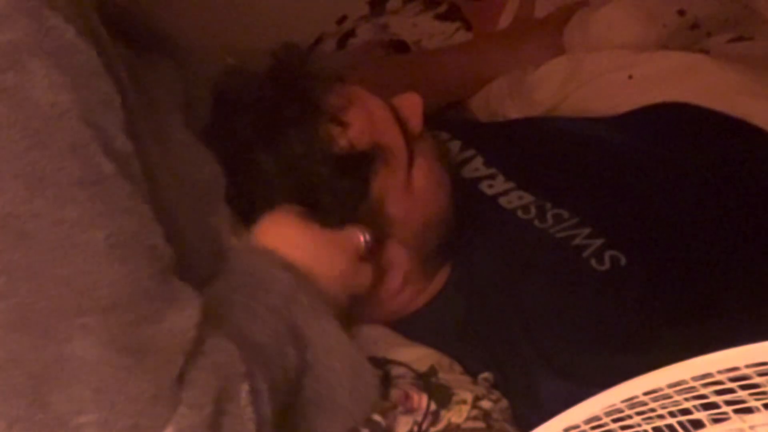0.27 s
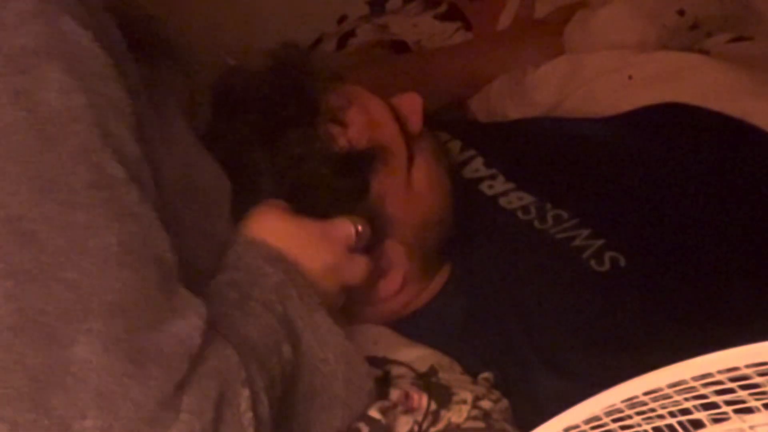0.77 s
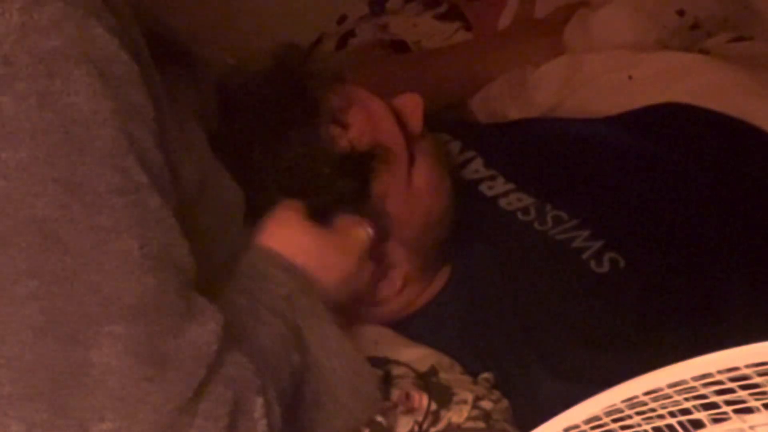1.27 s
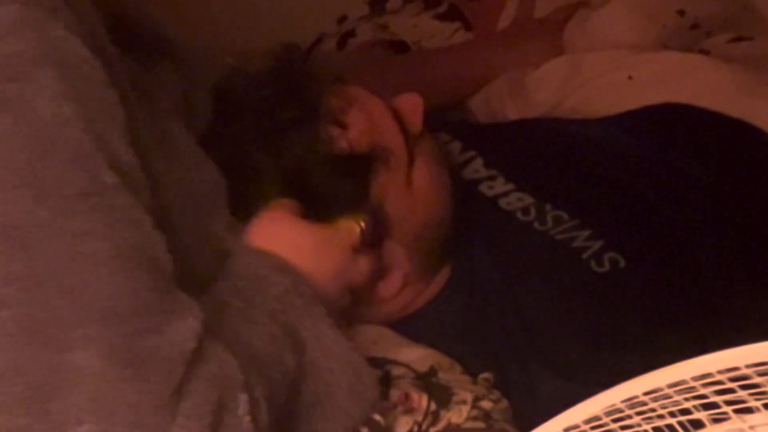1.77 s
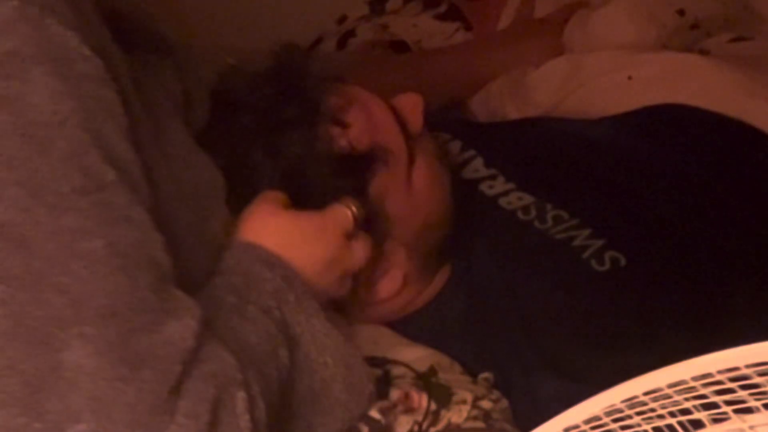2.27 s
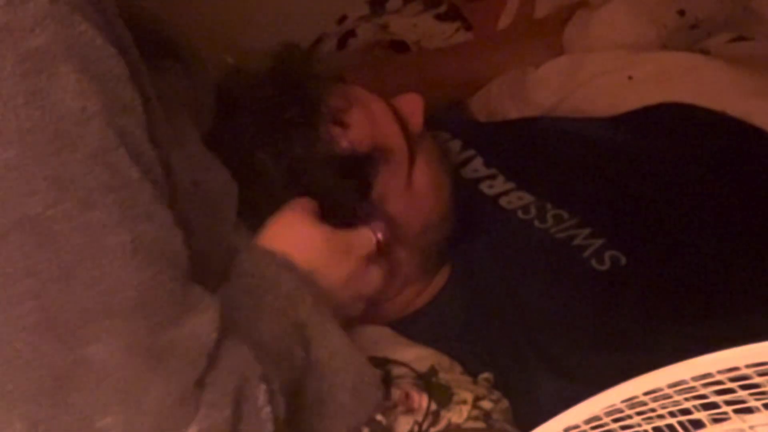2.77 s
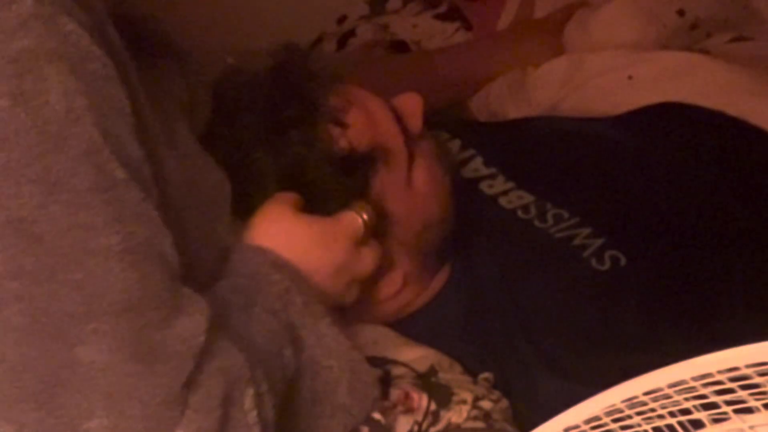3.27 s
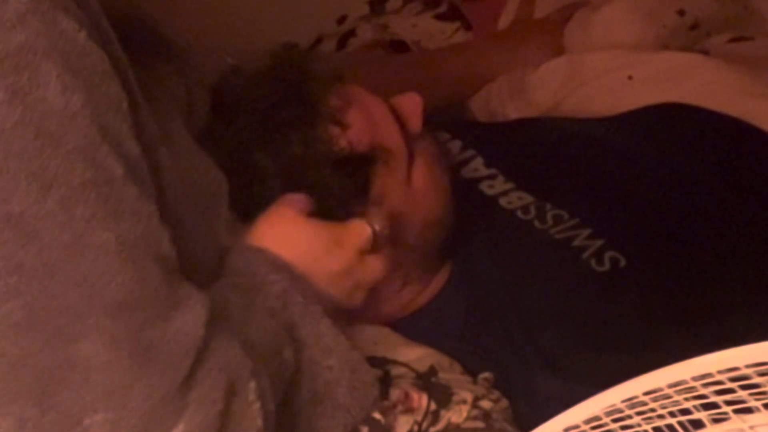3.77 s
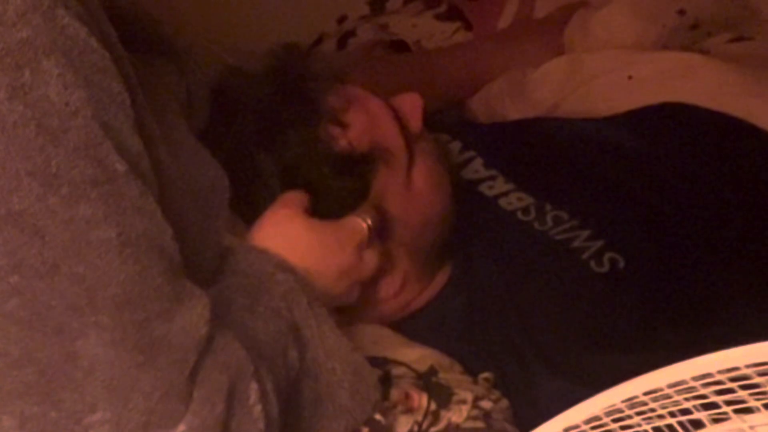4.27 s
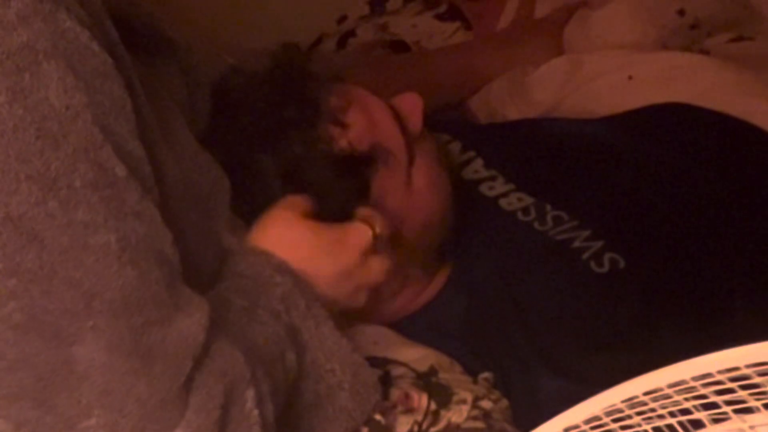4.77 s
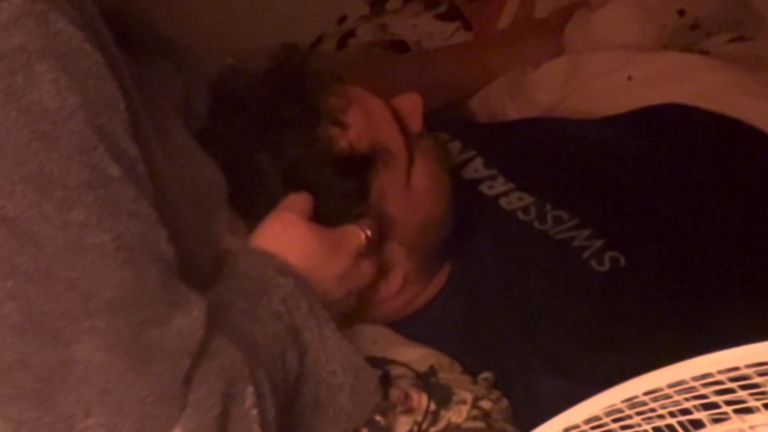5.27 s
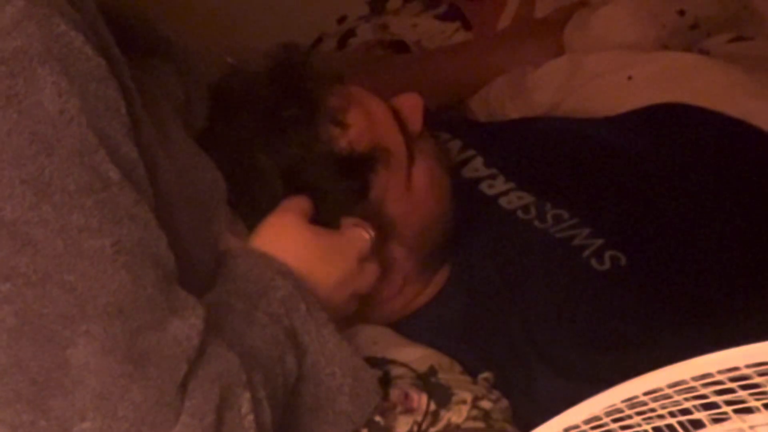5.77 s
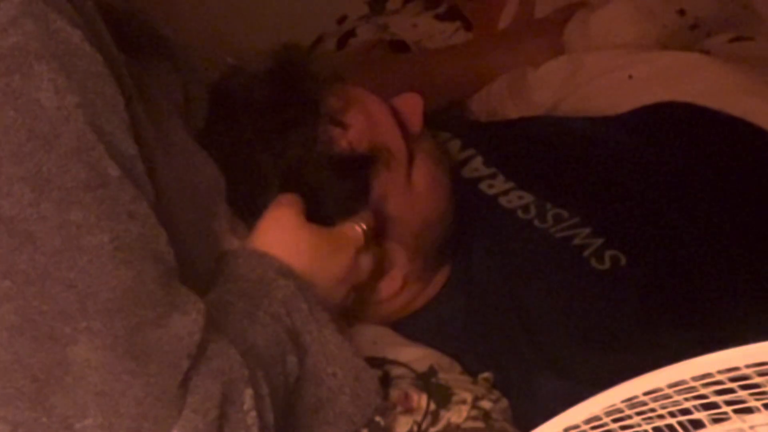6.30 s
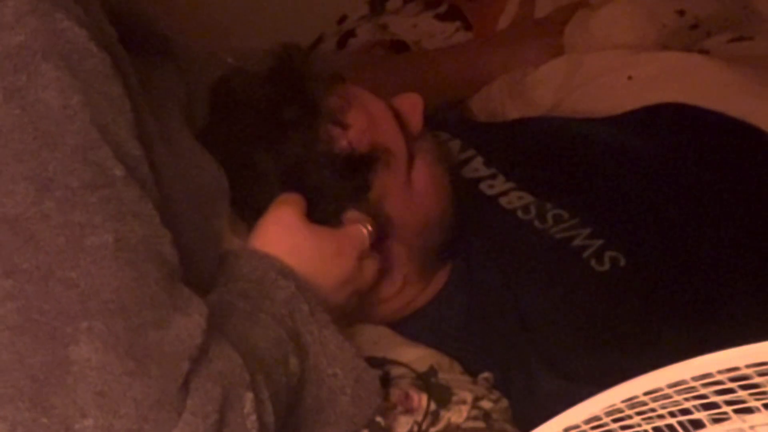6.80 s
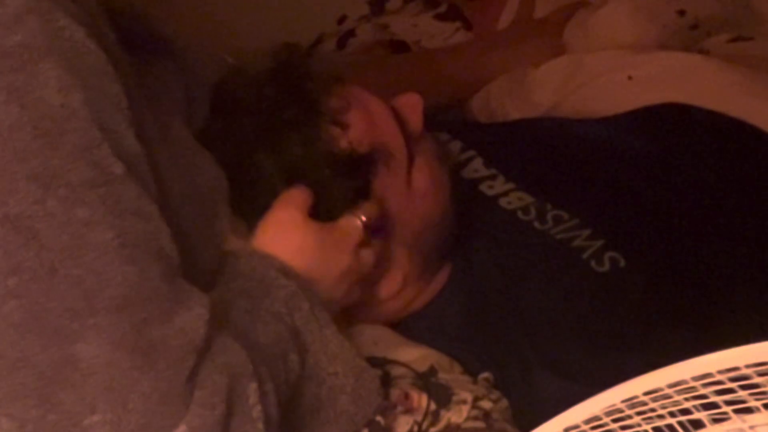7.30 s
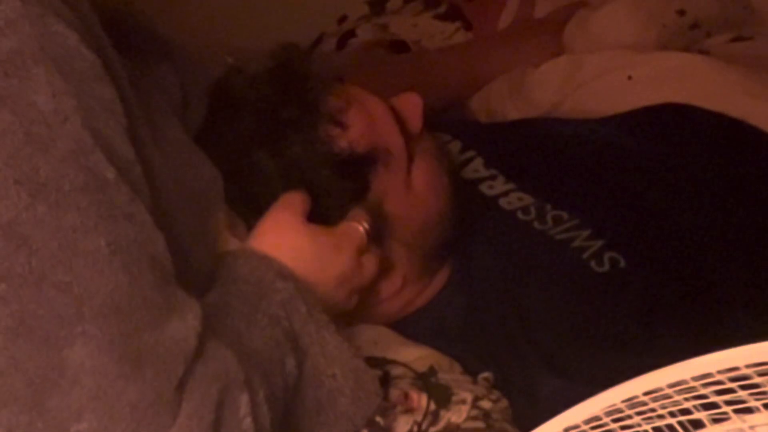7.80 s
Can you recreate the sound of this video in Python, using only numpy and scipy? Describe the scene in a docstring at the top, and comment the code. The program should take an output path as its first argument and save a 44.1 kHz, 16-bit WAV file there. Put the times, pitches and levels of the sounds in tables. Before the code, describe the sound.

Fingertips begin at once, combing hair close to the microphone with fine high-pitched rustling and clusters of crisp ticks. Early strokes are short and irregular; later ones are longer, slower and more crackly, with clear gaps. Soft cloth movement, dull scalp rubbing and slight padded bumps fall around them. Underneath, a deep constant fan hum continues unchanged, dry and without echo.

```python
"""A fan's low hum fills a quiet room as fingertips at once begin combing through hair close to a microphone.
Twelve strokes follow in eight seconds, the earlier ones quicker: dense stick-slip friction makes a fine
high hiss, sparse catches crackle in the tangles, and strands snap free as short damped rings.
Below, a sleeve brushes and finger pads rub the scalp as filtered grains; nudged bedding thuds as shaped noise.
The fan is a sine hum, wavering tones and filtered noise for its air and draught."""
import sys
import numpy as np
from scipy import signal
from scipy.fft import rfft, irfft, next_fast_len
from scipy.io import wavfile
from scipy.ndimage import uniform_filter1d

SR = 44100
rng = np.random.default_rng(int(sys.argv[2]) if len(sys.argv) > 2 else 0)


def wav_record(signal):
    """Record a signal, one row per channel, as 16-bit PCM in the file named by sys.argv[1]."""
    frames = np.transpose(np.atleast_2d(signal))
    bounded = np.clip(frames, -1, 1)
    # unit amplitude maps onto the largest positive 16-bit level
    quanta = np.round(bounded * 32767).astype(np.int16)
    wavfile.write(sys.argv[1], SR, quanta)


N = 354828
TIME = np.arange(N) / SR  # s

# Spectra, of which only the shape counts: frequency_hz, density_db (per Hz)
AIR_COLOUR = [(25, 8.5), (45, 1), (70, 5), (110, 0.5), (160, -3.5), (250, -5.5), (450, -16.5), (800, -16.5),
              (1400, -23), (3000, -26), (6000, -29), (11000, -29), (16000, -40)]
STRAND_COLOUR = [(2000, -14), (4500, 15.5), (7700, 1), (8800, -2), (11000, -1), (13400, -2.5), (15800, -9)]
SCRAPE_COLOUR = [(600, -32.5), (1500, -9), (2500, -6), (4500, -3), (7000, -2.5), (11000, -3), (16000, -2)]
SLEEVE_COLOUR = [(80, 12), (200, 9.5), (450, 5.5), (600, 3.5), (950, 1), (1700, -3), (2250, -4.5),
                 (2700, -6), (4000, -8), (8000, -18.5), (16000, -24)]
SCALP_COLOUR = [(50, 13), (110, -14), (190, 1.5), (280, -1), (400, 0.5), (470, -5), (900, -15.5),
                (2500, -32.5)]
# Thud spectrum for a ring at NUDGE_RING_HZ; it shifts with the ring: frequency_hz, density_db (per Hz)
NUDGE_COLOUR = [(50, -22), (120, -1), (190, -12), (245, 6.5), (300, -15), (700, -20), (2000, -62)]

# Fan motor and blade tones: frequency_hz, level_db (rms, about which it wavers)
FAN_TONES = [(100, -66), (175, -72.5), (349.8, -69), (496, -77.5), (589, -75.5), (909, -75.5), (950, -87.5),
             (991, -80.5)]
# Resonances of slack, middling and taut strands: frequency_hz, width_hz (of one filter pass)
STRAND_MODES = [(9500, 2000), (11200, 1900), (13000, 2300)]
# Fingers stroking through the hair: start_s, length_s, rise_s, level_db, growth_db (over the stroke),
# first_ring_hz, last_ring_hz, focus_db (on that ring)
STROKES = [(0.0, 0.57, 0.13, -50, 1, 12000, 12700, 3.5), (0.554, 0.4, 0.035, -58.5, 7.5, 9900, 10500, 3),
           (1.114, 0.16, 0.13, -51.5, -5.5, 11200, 10900, -1),
           (1.475, .45, 0.06, -57.5, 5.5, 12500, 12500, 5), (1.948, 0.35, 0.056, -53, 0.5, 10100, 10900, 5),
           (2.465, 0.11, 0.11, -50.5, 2.5, 11000, 10700, 9), (2.778, 0.31, .12, -57, 2, 12400, 12000, 3),
           (3.122, 0.35, 0.023, -53, 4, 10800, 10400, 4), (3.999, 0.55, 0.11, -50, 3.5, 10300, 11100, 10),
           (5.113, 0.5, 0.13, -43.5, -5.5, 11700, 11220, 16), (6.196, .52, 0.042, -52, 7, 11200, 11400, 16),
           (7.287, 0.53, 0.092, -56.5, 9.5, 11400, 11000, 7)]
# Tangles the fingers pull through: centre_s, width_s, crackle_share (added, 0 to 1), extra_drag_db
TANGLES = [(.394, 0.44, 0.53, 0), (1.227, 0.22, 0.23, 8.5), (1.8, 0.36, 0.4, 2.5), (3.055, .1, 0.94, 8),
           (3.267, 0.24, .45, -1), (4.286, 0.32, 0.8, -2.5), (5.304, 0.51, 0.67, 1),
           (6.474, 0.34, 0.97, -3), (7.463, 0.36, 0.65, 1), (7.83, 0.069, 0, 4)]
# The hand shifts, mostly back for the next stroke: time_s, rise_s, hold_s, fall_s, sleeve_db (before cloth_db)
SHIFTS = [(0.0, 0.14, 0.15, 0.14, -51), (0.372, 0.075, 0.13, 0.15, -59), (.92, .1, 0.061, .1, -58),
          (1.177, 0.048, 0.14, 0.021, -54), (2.517, 0.092, 0.11, 0.15, -51.5),
          (3.645, 0.066, .12, 0.048, -55.5), (4.653, 0.12, 0.16, .08, -58.5),
          (5.754, .2, 0.026, 0.072, -55), (5.91, .04, .02, 0.027, -57), (6.705, 0.073, 0.058, 0.068, -58),
          (7.092, 0.058, 0.028, 0.023, -47.5), (7.95, 0.045, .03, 0.028, -52)]
# Finger pads pressing on the scalp: centre_s, width_s, level_db (before pads_db)
PRESSES = [(0.013, 0.11, -47), (.55, 0.32, -56), (1.815, 0.93, -56.5), (3.166, 0.4, -51), (4.55, 0.24, -62),
           (5.438, 0.32, -52), (6.25, 0.24, -50), (7.55, 0.92, -58)]
# The loudest strands snapping free: time_s, level_db (before SNAP_DB), ring_hz
STRAND_SNAPS = [(0.2738, -39, 12000), (0.288, -29, 12100), (0.3212, -30.5, 10530), (0.3474, -28.5, 11500),
                (0.3631, -25.5, 12400), (0.4438, -26.5, 11500), (0.4585, -28, 10800), (0.4906, -31, 11600),
                (1.7789, -38, 12600), (2.9755, -27.5, 12700), (3.0487, -28, 11300), (3.0684, -25.5, 13000),
                (3.2365, -33, 11500), (3.3308, -30, 11800), (4.1366, -21.5, 10500), (4.2063, -30, 9880),
                (4.2116, -36, 10400), (4.2298, -34, 10100), (4.241, -29, 10300), (4.296, -30, 11000),
                (4.3254, -33, 9540), (4.34, -26, 11300), (4.3444, -21, 10900), (4.3858, -23.5, 11400),
                (4.3954, -34, 10800), (4.4424, -28, 10900), (4.4816, -25.5, 11400), (5.1564, -29.5, 11500),
                (5.198, -25.5, 10800), (5.2472, -27, 10900), (5.2689, -26, 11500), (5.295, -27, 11500),
                (5.3837, -30, 11400), (6.2943, -28, 10500), (6.344, -28, 10700), (6.371, -32, 10300),
                (6.4183, -27, 11700), (6.4285, -27, 11200), (6.4424, -37, 11600), (6.4744, -24.5, 11400),
                (6.4877, -25.5, 11700), (6.5101, -26.5, 11400), (6.573, -30, 10600), (6.6218, -31, 11600),
                (7.4087, -30.5, 10200), (7.4679, -31, 11700), (7.5445, -23.5, 10800)]
# The hand nudges the head against the bedding: centre_s, width_s, level_db, ring_hz
NUDGES = [(1.206, 0.064, -55, 238), (2.61, 0.15, -50.5, 247), (3.76, 0.16, -59.5, 199),
          (5.862, 0.27, -52, 201), (7.116, 0.051, -45, 204), (7.927, 0.044, -49.5, 240)]

HUM_HZ = 49.96
HUM_DB, AIR_DB, DRAUGHT_DB = -32.5, -52.5, -39  # rms levels
TOUCH_DB, RELEASE_DB_PER_S = -16.5, 228  # a stroke starts this far under its level; decay as the fingers lift
FOCUS_AT_END = 0.3  # share of the focus left once the lock has fanned out
JERK_DB, JERKS_PER_S = 4, 66  # the pull is uneven inside a tangle
GRAZE_DB, SHIFT_PADS_DB = -10.5, -7  # hair grazed and scalp rubbed during a shift, against the sleeve
SLEEVE_REST_DB, SLEEVE_STROKE_DB = -61, -17.5  # resting sleeve before cloth_db; moving sleeve against the stroke
PADS_REST_DB = -64.5  # before pads_db
SNAP_DB = 0.5  # added to every snap
SNAP_PEAK_S = .0012  # from the first slip of a strand to its loudest moment
# neighbours dragged along by a snap: width, delay, level against its table value, focus on its ring
BUNCH_S, BUNCH_LAG_S, BUNCH_DB, BUNCH_FOCUS_DB = 0.015, .002, -23, -2
STALL_S, STALL_DB = 0.02, -0.5  # the slide stalls while a strand is pulled taut, just before it snaps
NUDGE_RING_HZ = 245
TOP_HZ = 15800


def undb(db):
    """Logarithmic level: decibels become an amplitude ratio."""
    return 10 ** (np.asarray(db) / 20)


def unit(x):
    """Power normalisation: scale to rms 1."""
    return x / np.sqrt(np.mean(x ** 2))


def colour(x, points):
    """Linear filtering by a spectrum interpolated over log frequency; white input keeps its power."""
    hz, db = np.transpose(points)
    size = next_fast_len(N + 4096)
    bins = np.maximum(np.fft.rfftfreq(size, 1 / SR), 1)
    gain = unit(undb(np.interp(np.log(bins), np.log(hz), db)))
    return irfft(rfft(x, size) * gain, size)[:N]


def walk(rate):
    """Band-limited fluctuation: random levels held 1 / rate s and smoothed twice; rms 1."""
    hold = max(int(SR / rate), 2)
    held = rng.standard_normal(N)[np.arange(N) // hold]
    return unit(uniform_filter1d(uniform_filter1d(held, hold), hold))


def during(start, end):
    """Finite support: the samples between two times, with a margin for the fades."""
    return slice(int(max(start - .15, 0) * SR), int((end + .15) * SR))


def swell(s, rise, fall, hold=0):
    """Gaussian envelope: a smooth bump that reaches 1 at time s, holds and fades."""
    out = np.zeros(N)
    on = during(s - 2 * rise, s + hold + 2 * fall)
    age = TIME[on] - s
    before, after = np.minimum(age, 0), np.maximum(age - hold, 0)
    out[on] = np.exp(-(before / rise) ** 2 - (after / fall) ** 2)
    return out


def slips(per_second, spread_db):
    """Stick-slip friction: tiny clicks at random times, most weak and a few strong; rms 1."""
    fires = rng.random(N) < per_second / SR
    size = undb(spread_db * np.minimum(rng.exponential(size=N), 3.5))
    return unit(fires * size * np.sign(rng.standard_normal(N)))


def resonate(x, hz, width):
    """Resonance: a band-pass applied twice, for steep skirts."""
    b, a = signal.iirpeak(min(hz, .45 * SR), hz / width, fs=SR)
    return signal.lfilter(b, a, signal.lfilter(b, a, x))


def fan():
    """Periodic rotation and turbulence: mains hum, wavering motor tones, rushing air and a slow draught."""
    hum = np.sqrt(2) * undb(HUM_DB) * np.sin(2 * np.pi * HUM_HZ * TIME)
    # one wandering clock bends the pitch of all the tones together
    turning = TIME + np.cumsum(0.00051 * walk(rate=1.97)) / SR
    tones = 0
    for hz, db in FAN_TONES:
        level = np.sqrt(2) * undb(db + 2.4 * walk(rate=5))
        tones = tones + level * np.sin(2 * np.pi * (hz * turning + rng.random()))
    air = colour(rng.standard_normal(N), AIR_COLOUR) * undb(AIR_DB + 0.11 * walk(rate=2.8))
    slow_band = signal.butter(2, [1.5, 12], "bandpass", fs=SR, output="sos")
    buffets = signal.sosfilt(slow_band, rng.standard_normal(N))
    return hum + tones + air + undb(DRAUGHT_DB) * unit(buffets)


def shares(ring_hz, focus_db):
    """Modal coupling: power divides by each mode's distance from the ring; positive focus favours the near."""
    mode_hz = np.array(STRAND_MODES)[:, :1]
    spacing_hz = np.mean(np.diff(mode_hz[:, 0]))
    power = undb(-focus_db * ((mode_hz - ring_hz) / spacing_hz) ** 2) ** 2
    return power / power.sum(axis=0)


def strokes():
    """Modal excitation: each stroke rises, changes level and lifts off while its ring glides and focus weakens."""
    power = np.zeros((len(STRAND_MODES), N))
    for start, length, rise, db, growth_db, first_hz, last_hz, focus_db in STROKES:
        on = during(start, start + length)
        age = TIME[on] - start
        along = np.clip(age / length, 0, 1)
        off_hair_s = np.maximum(-age, 0) + np.maximum(age - length, 0)
        touch_db = TOUCH_DB * np.clip(1 - age / rise, 0, 1)
        level_db = db + growth_db * along + touch_db - RELEASE_DB_PER_S * off_hair_s
        ring_hz = first_hz + (last_hz - first_hz) * along
        power[:, on] += undb(level_db) ** 2 * shares(ring_hz, focus_db * FOCUS_AT_END ** along)
    return power


def shifting():
    """Superposed envelopes: sleeve amplitude, before cloth_db, as the hand moves to a new place."""
    return sum(undb(db) * swell(s, rise, fall, hold) for s, rise, hold, fall, db in SHIFTS)


def snagging():
    """Intermittent friction: in a tangle more slips become catches and the pull jerks; gives (share, gain)."""
    share, drag_db = np.full(N, .03), np.zeros(N)
    for s, length, part, db in TANGLES:
        on = during(s - length / 2, s + length / 2)
        inside = np.exp(-(2 * (TIME[on] - s) / length) ** 4)
        share[on] += part * inside
        drag_db[on] += db * inside
    share = np.clip(share, 0, .85)
    return share, undb(drag_db + JERK_DB * share * walk(rate=JERKS_PER_S))


def catches():
    """Clustered impulses: sparse clicks in little bunches, as a lock of hair lets go."""
    return unit(slips(per_second=1100, spread_db=3.8) * undb(2 * walk(rate=90)))


def bunches():
    """Coupled release: power in each strand mode from neighbours that slip along with a snapping strand."""
    power = np.zeros((len(STRAND_MODES), N))
    for s, db, hz in STRAND_SNAPS:
        on = during(s, s)
        burst = undb(db + BUNCH_DB) * swell(s + BUNCH_LAG_S, BUNCH_S / 2, BUNCH_S / 2)[on]
        power[:, on] += burst ** 2 * shares(hz, BUNCH_FOCUS_DB)
    return power


def stalls():
    """Static friction: the slide's gain drops while a strand is pulled taut and recovers around its snap."""
    taut = sum(swell(s - STALL_S / 2, STALL_S / 2, STALL_S / 2) for s, _, _ in STRAND_SNAPS)
    return undb(STALL_DB * np.minimum(taut, 1))


def hair(stroking, hiss_db=-1.56, chatter_db=1.0, scrape_db=-34.5, rest_db=-68):
    """Friction driving resonators: dense slips hiss, sparse catches crackle, and both ring the held strands."""
    snag, drag = snagging()
    catching = catches()
    loose = (undb(GRAZE_DB) * shifting()) ** 2 + undb(rest_db) ** 2
    power = stroking * (drag * stalls()) ** 2 + bunches() + loose / len(STRAND_MODES)
    weights = np.sqrt(power)
    total = np.linalg.norm(weights, axis=0)
    slide_db = 20 * np.log10(total)
    chatter = undb(chatter_db * walk(rate=58))
    smooth_part, snag_part = np.sqrt(1 - snag), np.sqrt(snag)
    ring = 0
    for (hz, width), weight in zip(STRAND_MODES, weights / total):
        sliding = slips(per_second=8800, spread_db=7.5) * chatter
        # a catch plucks each kind of strand in its own direction
        plucks = catching * np.sign(rng.standard_normal(N))
        friction = smooth_part * sliding + snag_part * plucks
        ring = ring + weight * unit(resonate(friction, hz, width))
    hiss = unit(colour(ring, STRAND_COLOUR)) * undb(slide_db + hiss_db)
    # the broad scrape of skin on hair grows more slowly than the hiss
    grip = smooth_part * slips(per_second=9500, spread_db=2.5) + snag_part * catching
    scrape = colour(grip, SCRAPE_COLOUR) * undb(0.44 * slide_db + scrape_db)
    return hiss + scrape


def hand(stroking, cloth_db=1.5, pads_db=1.76):
    """Surface friction: cloth brushes in soft grains, and the finger pads rub the scalp dully."""
    shift = shifting()
    stroke = np.sqrt(stroking.sum(axis=0))
    sleeve = np.sqrt(shift ** 2 + (undb(SLEEVE_STROKE_DB) * stroke) ** 2 + undb(SLEEVE_REST_DB) ** 2)
    press = sum(undb(db) * swell(s, length / 2, length / 2) for s, length, db in PRESSES)
    pressure = np.sqrt(press ** 2 + (undb(SHIFT_PADS_DB) * shift) ** 2 + undb(PADS_REST_DB) ** 2)
    cloth = colour(slips(per_second=6000, spread_db=1.0), SLEEVE_COLOUR) * undb(1.1 * walk(rate=40))
    pads = colour(slips(per_second=2500, spread_db=3.5), SCALP_COLOUR) * undb(1.6 * walk(rate=25))
    return cloth * sleeve * undb(cloth_db) + pads * pressure * undb(pads_db)


def snaps(rise_s=0.00013, ring_s=.00012, low_hz=4900, low_db=-16, flutter_s=0.0024, flutter_db=-18):
    """Damped free vibration: a freed strand rings briefly, with a weaker low mode and a noisy flutter."""
    out, t = np.zeros(N + 512), np.arange(512) / SR
    pluck = (1 - np.exp(-t / rise_s)) ** 3 * np.exp(-t / ring_s)
    pluck = pluck / pluck.max()
    for s, db, hz in STRAND_SNAPS:
        noise = rng.standard_normal(len(t))
        stiffness = 1 + .1 * noise[-1]  # scatters the low mode about low_hz
        modes = np.sin(2 * np.pi * hz * t) + undb(low_db) * np.sin(2 * np.pi * low_hz * stiffness * t)
        # the strand flutters against its neighbours
        flutter = unit(resonate(noise, hz, width=7800.0)) * np.exp(-t / flutter_s)
        start = int(np.clip((s + SNAP_PEAK_S) * SR - np.argmax(pluck), 0, N))
        out[start:start + len(t)] += undb(db + SNAP_DB) * (pluck * modes + undb(flutter_db) * flutter)
    return out[:N]


def nudges():
    """Padded impact: the head thuds dully on the bedding; its whole spectrum scales with its ring."""
    noise = rng.standard_normal(N)
    out = np.zeros(N)
    for s, length, db, hz in NUDGES:
        spectrum = np.array(NUDGE_COLOUR) * [hz / NUDGE_RING_HZ, 1]
        out += undb(db) * swell(s, length / 2, length / 2) * colour(noise, spectrum)
    return out


def scene():
    """Superposition: the sources add directly without reverberation, close and dry among the bedding."""
    stroking = strokes()
    return (fan() + hair(stroking) + hand(stroking) + snaps() + nudges())[None]


def record(dry):
    """Band limiting: the recorder cuts the top steeply with an elliptic low-pass."""
    return signal.sosfilt(signal.ellip(10, .2, 70, TOP_HZ, fs=SR, output="sos"), dry)


dry = scene()
out = record(dry)
wav_record(out)
```